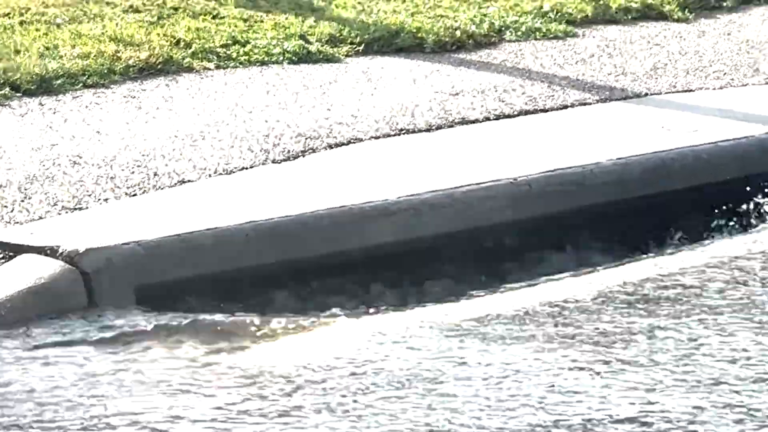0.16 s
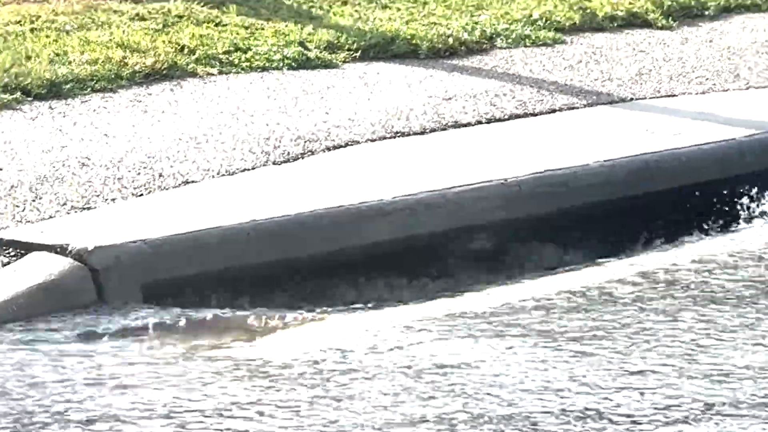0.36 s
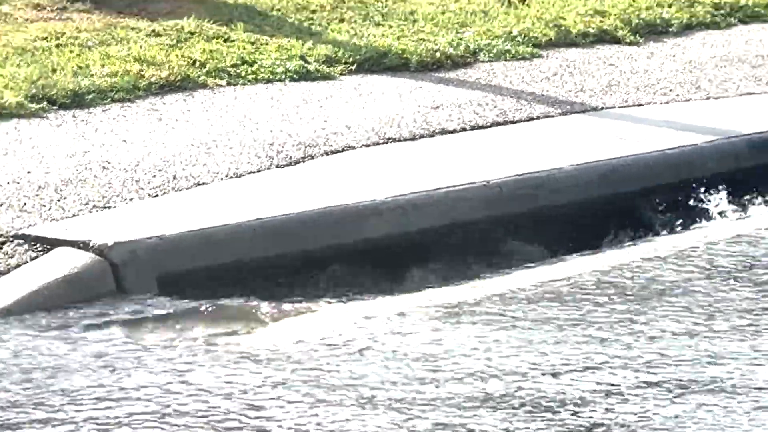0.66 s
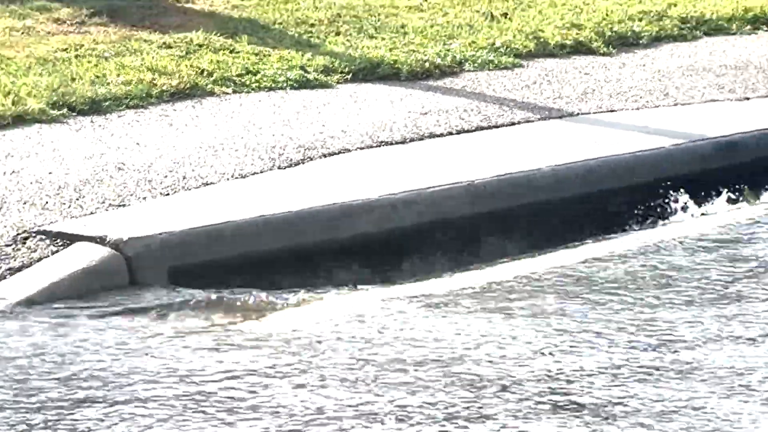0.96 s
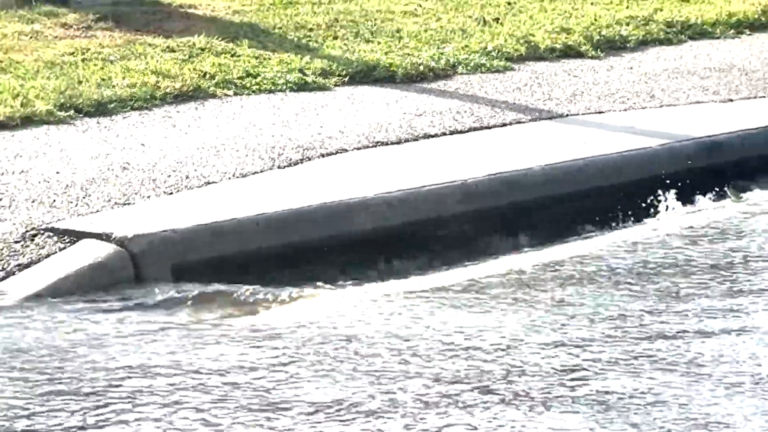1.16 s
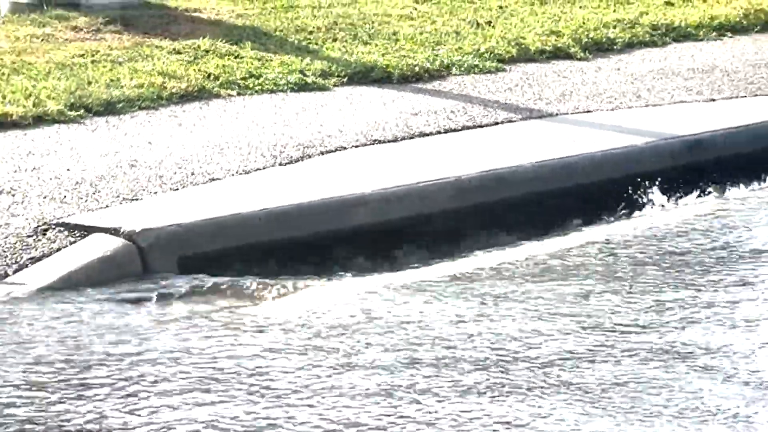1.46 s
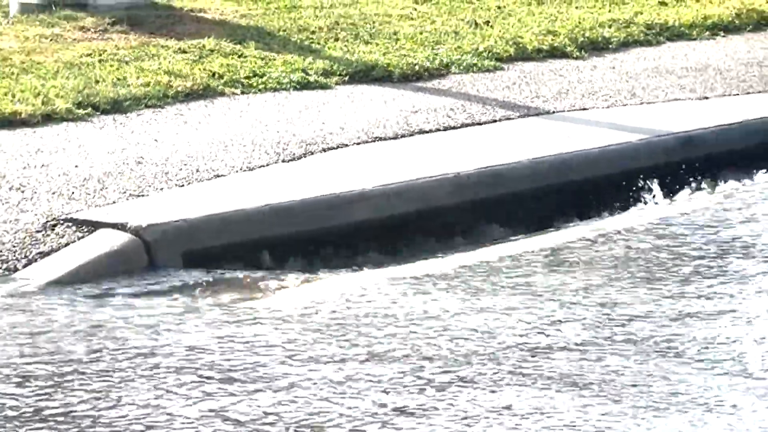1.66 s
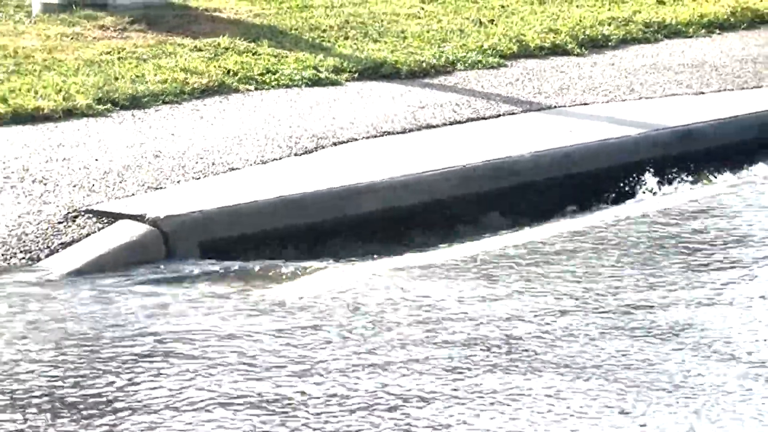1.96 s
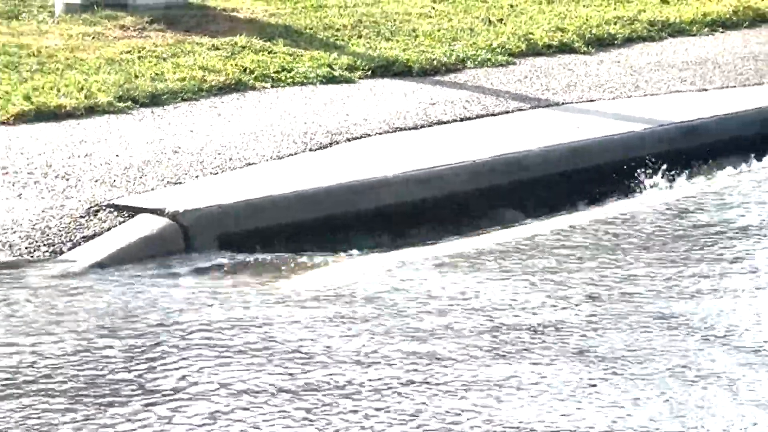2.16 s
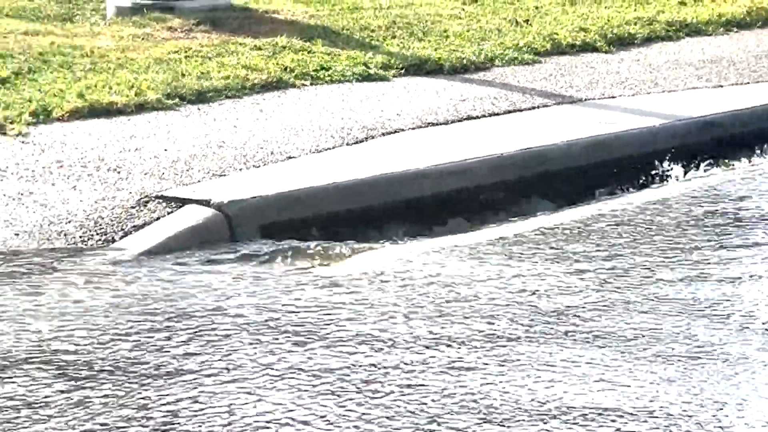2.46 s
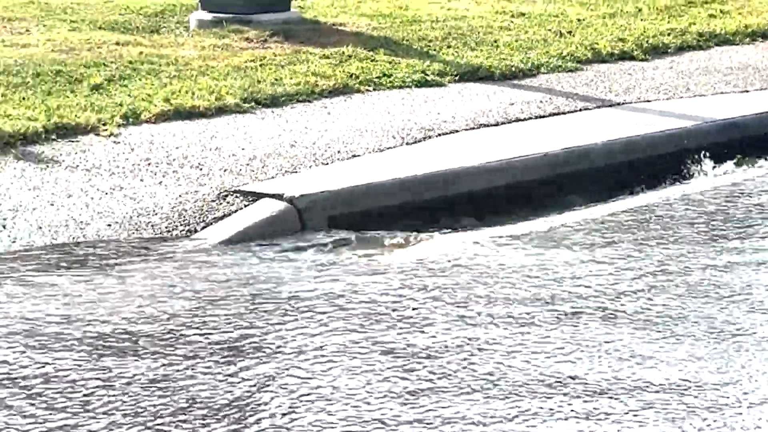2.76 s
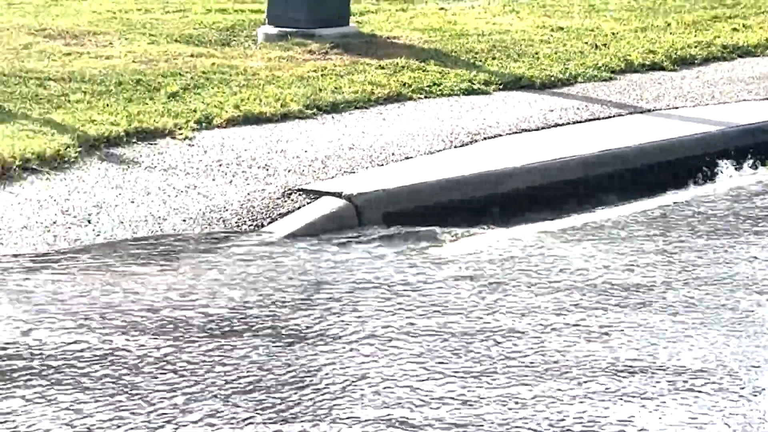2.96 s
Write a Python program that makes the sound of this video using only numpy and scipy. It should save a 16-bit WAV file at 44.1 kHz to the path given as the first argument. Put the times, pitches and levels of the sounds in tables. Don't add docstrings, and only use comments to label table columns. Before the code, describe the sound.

Water pours steadily into a curb drain, splashing and gulping, with a deep hum beneath

```python
import sys
import numpy as np
from scipy import signal
from scipy.fft import rfft, irfft, next_fast_len
from scipy.io import wavfile
from scipy.ndimage import uniform_filter1d, map_coordinates

SR = 44100
rng = np.random.default_rng(int(sys.argv[2]) if len(sys.argv) > 2 else 0)


def ratio(d):
    e = np.asarray(d, float) / 20
    return 10 ** e


def log_audio(samples):
    frames = np.atleast_2d(samples).T
    limited = np.clip(frames, -1, 1)
    pcm = np.round(limited * 32767).astype(np.int16)
    wavfile.write(sys.argv[1], SR, pcm)


N = 136710
TIME = np.arange(N) / SR

# [t/s, spray level/dB, extra churn level/dB]
FLOW_STRENGTH = [
    (0.0, -55, 1),
    (0.47, -53, -1),
    (2.18, -54.5, -0.5),
    (2.34, -55, 1),
    (2.94, -56, 2.5),
    (3.1, -52, -2.5),
]
# [t/s, level/dB, length/s]
WAVE_SURGES = [
    (0.26, 0, .06),
    (.6, 0.5, 0.036),
    (0.785, 1, 0.12),
    (1.01, -2, .03),
    (1.33, 1, 0.14),
    (1.813, 1, .07),
    (2.044, 1, 0.12),
    (2.154, 2, 0.036),
    (2.736, 1.5, 0.042),
]
# [f/Hz, level/dB]
WATER_COLOUR = [(140, -23), (260, -1), (480, -2.5), (1000, -7), (1900, -11), (3000, -19.5), (5000, -27),
                (15000, -24.5)]
# [t/s, peak level/dB, f/Hz, length/cycles]
BIG_GULPS = [(0.179, -32, 562, 7.2), (0.765, -41, 517, 4.1), (0.896, -31, 400, 2.7), (1.199, -18, 497, 4.4),
             (1.246, -31, 480, 5.1), (1.273, -30, 575, 6.7), (1.768, -30, 460, 5), (2.133, -33, 410, 5),
             (2.291, -34, 426, 7.6), (2.683, -32, 483, 4), (2.711, -28, 523, 3.9), (2.726, -27, 510, 6.1),
             (2.765, -29.5, 440, 5), (2.924, -27, 538, 1.9), (2.989, -28.5, 476, 5), (3.028, -30, 520, 4.2)]
# [t/s, peak level/dB, f/Hz, length/cycles]
RINGING_DRIPS = [(.2075, -30, 890, 13), (.204, -38, 700, 4), (0.24, -39, 1200, 3.6), (.2065, -35, 1800, 13),
                 (.212, -44, 2760, 8.6), (0.24, -46.5, 5000, 16.3), (0.073, -38.5, 440, 8.4),
                 (0.26, -42, 1000, 5), (.189, -37, 540, 2.7), (1, -38, 480, 7), (.57, -45, 550, 5.3),
                 (.212, -44, 2120, 8), (1.1975, -36, 1500, 5), (2.93, -38, 990, 5.3), (2.14, -41.5, 990, 6),
                 (1.017, -39, 1650, 9), (1.2015, -33, 450, 4), (.236, -41, 980, 5), (1.21, -37, 450, 3.4),
                 (1.5, -36, 407, 4.5), (1.1, -39, 800, 4.6), (1.4, -38, 680, 2.8), (1.282, -41, 580, 2.3),
                 (2.762, -39, 1000, 7.2), (2.872, -40, 775, 6.6), (3.088, -39.5, 430, 5.4),
                 (3.088, -45, 1160, 6)]
# [t/s, peak level/dB, f/Hz]
SMALL_GURGLES = [(0.063, -29.5, 457), (0.131, -35, 304), (0.472, -36, 320), (0.499, -36, 418),
                 (0.563, -33, 482), (0.677, -28, 356), (0.803, -36, 616), (1.383, -36, 336),
                 (1.407, -34, 466), (1.685, -36, 468), (1.925, -36, 464), (2.069, -35, 398),
                 (2.197, -33, 355), (2.259, -39, 390), (2.361, -32, 483), (2.409, -33, 331),
                 (2.532, -32, 441), (2.604, -40, 511), (2.972, -32, 501)]
# [t/s, peak level/dB, f/Hz]
DROP_PLINKS = [(0.3272, -34, 1230), (0.412, -40, 1280), (0.4983, -39, 961), (0.5492, -38, 1040),
               (0.6774, -35, 939), (0.943, -31.5, 1100), (1.058, -33, 1030), (1.1233, -38, 1120),
               (1.2426, -31, 1210), (1.353, -38, 1570), (1.5115, -37, 905), (1.694, -34, 1100),
               (1.7553, -35, 1150), (1.8457, -36, 1240), (1.9021, -35, 1280), (1.918, -35, 2140),
               (1.9904, -36, 1670), (2.0075, -30, 1220), (2.1316, -35, 1150), (2.2947, -40, 982),
               (2.3615, -39, 1210), (2.5213, -37, 1010), (2.5755, -32, 910), (2.6397, -33, 902),
               (2.6823, -30.5, 961), (2.752, -34, 1140)]
# [t/s, peak level/dB, f/Hz]
SPRAY_TICKS = [(0.3784, -44, 3170), (0.4054, -43, 3160), (0.4414, -40, 6450), (0.5524, -44, 4060),
               (0.7474, -43, 6400), (1.3504, -46, 3010), (1.4202, -46, 3910), (1.6591, -37, 4530),
               (1.7734, -45, 3940), (1.9794, -44, 3090), (2.0073, -38, 6010), (2.1474, -45, 3190),
               (2.7092, -39, 6820), (2.7344, -44, 6190)]
# [t/s, peak level/dB, length/s, low part level/dB]
LIP_SPLASHES = [(0.204, -35.5, 0.011, 12), (0.215, -31.5, 0.01, 0), (0.288, -37, 0.027, -7),
                (0.416, -37, 0.0065, -12), (0.443, -40, 0.01, 0), (0.767, -42, 0.02, 6),
                (1.418, -31, 0.0027, -6), (1.658, -36, 0.0061, -12), (2.006, -32.5, 0.0072, 2),
                (2.068, -35, 0.0071, -3), (2.123, -43, 0.0092, -2), (2.146, -40, 0.011, 0),
                (2.29, -39, 0.008, -6), (2.681, -32.5, 0.006, 10)]
# [f/Hz, level/dB]
EXHAUST_COLOUR = [(22, -13), (34, -3), (48, -2), (85, -3.5), (135, 1), (152, -3), (230, -12.5),
                  (400, -35.5)]
# [multiple of the firing rate, rms level/dB]
ENGINE_ORDERS = [(2, -59), (2.5, -49.5), (3, -48.5), (4, -48), (5, -49.5), (6, -59.5), (7, -57.5),
                 (8, -62.5)]
# [t/s, level/dB]
ENGINE_EFFORT = [(0.0, -35), (0.09, -45), (0.12, -40.5), (0.34, -39.5), (0.4, -39), (2.35, -38),
                 (2.41, -41.5), (2.45, -37), (2.61, -41), (2.66, -34.5), (2.97, -37.5), (3.1, -45)]
# [t/s, peak level/dB, f/Hz, length/s]
WIND_PUFFS = [
    (2.705, -31.5, 63, 0.019),
    (2.855, -51, 87, 0.033),
    (2.985, -29, 69.6, 0.026),
    (2.3, -30.5, 99.4, 0.015),
    (0.86, -41, 90, 0.017),
    (2.8, -35.5, 52, 0.021),
    (2.92, -35, 109, 0.017),
]
# [f/Hz, level/dB]
SUM_COLOUR = [(20, -6.5), (40, 1.5), (4600, -1), (4950, -4.5), (5400, 0.5), (8500, -1.5), (10400, -11),
              (11000, -24.5)]
# [f/Hz, level/dB]
SUM_TOP_COLOUR = [(12600, -46), (13800, -37), (14300, -12.5), (14900, -10.5)]
# [f/Hz, level/dB]
DIFFERENCE_LOW = [(30, -45), (90, -46), (150, -32.5), (220, -17), (800, -15.5), (1250, -21.5),
                  (1400, -34.5), (3000, -68)]
# [f/Hz, level/dB]
DIFFERENCE_HIGH = [(4300, -45), (4650, -11.5), (5050, -3.5), (5300, -40), (6100, -28), (6900, -8.5),
                   (8600, -3.5), (15000, -7.5)]
# [t/s, shift/dB]
NULL_MOVES = [(.195, 16), (.58, -7), (.66, -3.5), (.765, -6), (.785, -5), (.925, 11), (1.09, -8),
              (1.135, 11), (1.28, -10), (1.385, -5), (1.405, -4), (2.045, -11), (2.135, 11), (2.39, -8),
              (2.585, 12), (2.758, 11), (3.005, 17)]
TOP_BAND_LULLS = [
    .032,
    1.29,
    1.34,
    2.255,
    3.065,
]


def unit(x):
    return x / np.sqrt(np.mean(x ** 2) + 1e-20)


def along(points, hz):
    f, level = np.transpose(points)
    return ratio(np.interp(np.log(hz + 1), np.log(f + 1), level))


def wobble(rate):
    knots = rng.standard_normal(int(N * rate / SR) + 4)
    return map_coordinates(knots, [np.arange(N) * rate / SR])


def hump(s, length):
    return np.exp(-((TIME - s) / length) ** 2)


def band(hz, centre_hz):
    return np.exp(-(np.log(hz / centre_hz + 1e-9) / .5) ** 2)


def filtered(x, response):
    m = next_fast_len(N + 8192)
    return irfft(rfft(x, m) * response(np.fft.rfftfreq(m, 1 / SR)), m)[..., :N]


def high_part(x, corner_hz=2400, order=4):
    return filtered(x, lambda hz: 1 / (1 + (corner_hz / (hz + 1)) ** order))


def bells(s, gain, hz, cycles, rise, size):
    t = np.arange(size) / SR
    u = t * (hz / np.clip(cycles, .5, 40))[:, None]
    envelope = np.e * 2 * u * np.exp(-2 * u) * np.exp(-u ** 2)
    wave = gain[:, None] * envelope * np.sin(2 * np.pi * hz[:, None] * t * (1 + rise * u / 2))
    at = (s * SR).astype(int)[:, None] + np.arange(size)
    return np.bincount(at.ravel(), wave.ravel(), N + size + SR)[:N]


def swarm(count, centre_hz, spread, cycles, scatter_db, tilt_db, cap_db, low_hz, rise, size):
    clouds = []
    for _ in range(2):
        s = rng.random(count) * N / SR
        pitch = rng.standard_normal(count)
        db = np.minimum(-scatter_db * np.log(1 - rng.random(count)), cap_db) + tilt_db * pitch
        hz = np.clip(centre_hz * np.exp(spread * pitch), low_hz, 16000)
        clouds.append(bells(s, ratio(db), hz, cycles, rise, size))
    return unit(np.array(clouds))


def flow():
    s, spray, churn = np.transpose(FLOW_STRENGTH)
    spray_db = np.interp(TIME, s, spray - spray.mean())
    spray_db = spray_db + sum(db * hump(at, length) for at, db, length in WAVE_SURGES)
    return spray_db, spray_db + np.interp(TIME, s, churn)


def water():
    sheet_db, bubbles_db, fine_spray_db = -43.5, -50, -63.5
    spray_db, churn_db = flow()
    z = signal.stft(rng.standard_normal((2, N)), nperseg=256)[2]
    patches = uniform_filter1d(rng.standard_normal(z.shape[1:]), size=10, axis=0)
    patches = uniform_filter1d(patches, size=6, axis=1)
    sheet = signal.istft(z * ratio(unit(patches)), nperseg=256)[1][:, :N]
    sheet = ratio(sheet_db) * unit(filtered(sheet, lambda hz: along(WATER_COLOUR, hz)))
    hiss = high_part(sheet)
    slosh = 0.25 * wobble(7.51) + 0.33 * wobble(24.88) + 0.34 * wobble(70)
    churn = (sheet - hiss) * ratio(churn_db + 1.43 * slosh + 0.67 * wobble(11.11))
    sheet = hiss * ratio(spray_db + slosh) + churn
    bubbles = swarm(count=3000, centre_hz=950, spread=.75, cycles=4.5, scatter_db=3.5, tilt_db=-4,
                    cap_db=8, low_hz=380, rise=.15, size=900)
    spray = swarm(count=3000, centre_hz=5500, spread=.5, cycles=3.5, scatter_db=4, tilt_db=0,
                  cap_db=15, low_hz=2700, rise=.1, size=120)
    spray = ratio(fine_spray_db + 1.9 * spray_db + 1.7 * slosh) * spray
    return sheet + ratio(bubbles_db + churn_db) * bubbles + spray


def splashes():
    noise = rng.standard_normal((2, N))
    noise = unit(filtered(noise, lambda hz: along(WATER_COLOUR, hz) * hz / (hz + 1500)))
    high = high_part(noise)
    high_burst, low_burst = 0, 0
    for s, db, length, low_db in LIP_SPLASHES:
        away = np.abs((TIME - s - .002) / max(length, .001))
        burst = ratio(db - 5.0 - 20.3 * away ** 0.56)
        high_burst = high_burst + burst
        low_burst = low_burst + burst * ratio(low_db)
    scale = 1 / np.sqrt(np.mean(high ** 2))
    return scale * (high * high_burst + 0.34 * (noise - high) * low_burst)


def gulps():
    s, db, hz, cycles = np.transpose(BIG_GULPS)
    total = bells(s - .0003, ratio(db - 3.5), hz * 1.32, cycles, rise=-0.35, size=2000)
    s, db, hz, cycles = np.transpose(RINGING_DRIPS)
    total = total + bells(s, ratio(db + 3.0), hz, cycles, rise=0.17, size=2000)
    for events, cycles in ((SMALL_GURGLES, 3.6), (DROP_PLINKS, 4.6), (SPRAY_TICKS, 5)):
        s, db, hz = np.transpose(events)
        total = total + bells(s - .001, ratio(db - 3.5), hz, cycles, rise=0.071, size=1000)
    return total


def engine():
    firing_hz, speed_drift, order_sway_db, roar_db = 27.6, .007, 2, -41
    hum_hz, hum_drift_hz, hum_db = 37, 0.87, -44
    turns = np.cumsum(firing_hz * (1 + speed_drift * wobble(2.804))) / SR
    orders = 0
    for multiple, db in ENGINE_ORDERS:
        sway = ratio(db + order_sway_db * wobble(3.03))
        orders = orders + sway * np.sin(2 * np.pi * multiple * turns + 1.39 * wobble(5.13))
    hum = np.sin(2 * np.pi * np.cumsum(hum_hz + hum_drift_hz * wobble(5.8)) / SR)
    hum = ratio(hum_db + 0.62 * wobble(8.4)) * hum
    roar = unit(filtered(rng.standard_normal((2, N)), lambda hz: along(EXHAUST_COLOUR, hz)))
    roar = roar * ratio(roar_db - 2.5)
    s, db = np.transpose(ENGINE_EFFORT)
    effort = ratio(np.interp(TIME, s, db - db.mean()))
    tones = np.sqrt(2) * (effort ** 0.8 * orders + hum)
    return effort * roar + tones * [[1], [0]]


def wind():
    return sum(ratio(db) * hump(s, length) * np.cos(2 * np.pi * hz * (TIME - s))
               for s, db, hz, length in WIND_PUFFS)


def flutter():
    return ratio(7 * np.minimum(wobble(14), .6))


def port_sum(near):
    knee_hz, null_hz, skirt_hz = 10400, 12000, 14150
    shift_db = sum(db * hump(s, .014) for s, db in NULL_MOVES)
    lull_db = sum(-18 * hump(s, .016) for s in TOP_BAND_LULLS)
    body = filtered(near, lambda hz: along(SUM_COLOUR, hz) * (hz < knee_hz))
    below = filtered(near, lambda hz: along(SUM_COLOUR, hz) * (hz >= knee_hz) * (hz < null_hz))
    skirt = filtered(near, lambda hz: along(SUM_TOP_COLOUR, hz) * (hz >= null_hz) * (hz < skirt_hz))
    top = filtered(near, lambda hz: along(SUM_TOP_COLOUR, hz) * (hz >= skirt_hz))
    below = ratio(-1.4 * shift_db - 5) * below
    skirt = ratio(1.9 * shift_db - 10) * skirt
    above = ratio(lull_db) * flutter() ** .25 * ratio(2.5 * wobble(35) - 1.5) * (skirt + top)
    return body + below + above


def port_difference(near, far, puffs):
    same_share = .8

    def high(hz):
        return along(DIFFERENCE_HIGH, hz) * (hz > 3000)

    same = filtered(near, lambda hz: 1j * same_share * high(hz) - 0.044 * band(hz, 300))
    other = filtered(far, lambda hz: np.sqrt(1 - same_share ** 2) * high(hz))
    low = filtered(far, lambda hz: along(DIFFERENCE_LOW, hz))
    edge = high_part(low, corner_hz=880, order=8)
    unsettled = flutter() ** 0.55 * (low - edge) + 0.88 * flutter() * edge
    late = np.clip((TIME - 2.72) / 0.081, 0, 1)
    rustle = unit(filtered(rng.standard_normal(N), lambda hz: band(hz, 140)))
    return same + other + unsettled + .3 * late * np.abs(puffs) * rustle


def scene():
    near, far = water() + splashes() + engine()
    puffs = wind()
    near = near + gulps() + puffs
    mid = port_sum(near)
    side = port_difference(near, far, puffs)
    return np.array([mid + side, mid - side])


def top_cut(x):
    return signal.sosfilt(signal.butter(12, 16360, fs=SR, output="sos"), x)


def record(dry):
    mix = filtered(dry, lambda hz: hz < 14960)
    return top_cut(mix)


dry = scene()
out = record(dry)
log_audio(out)
```